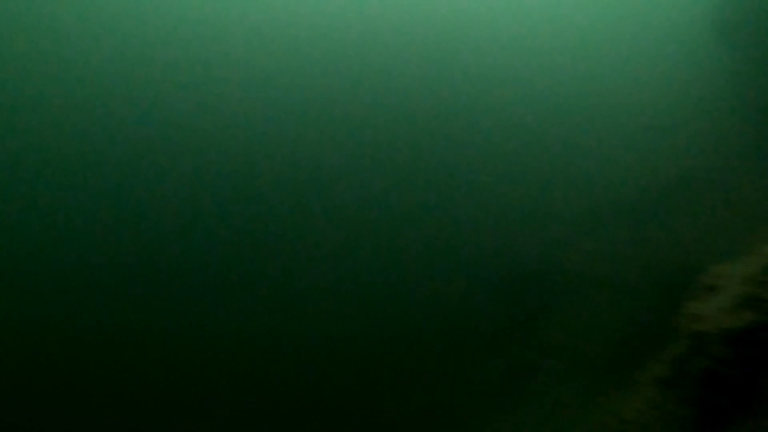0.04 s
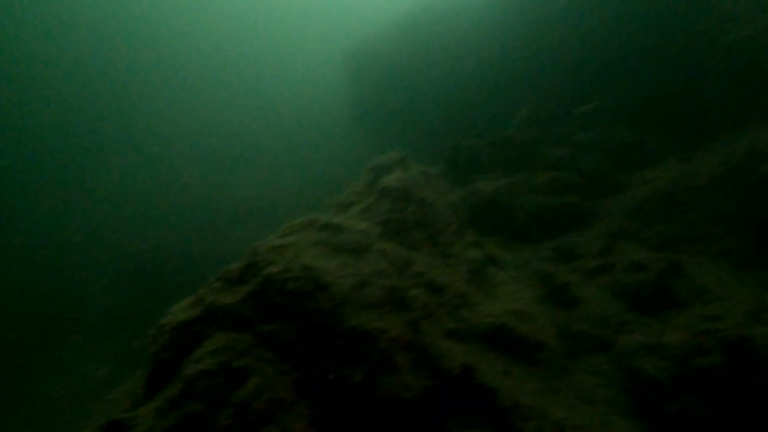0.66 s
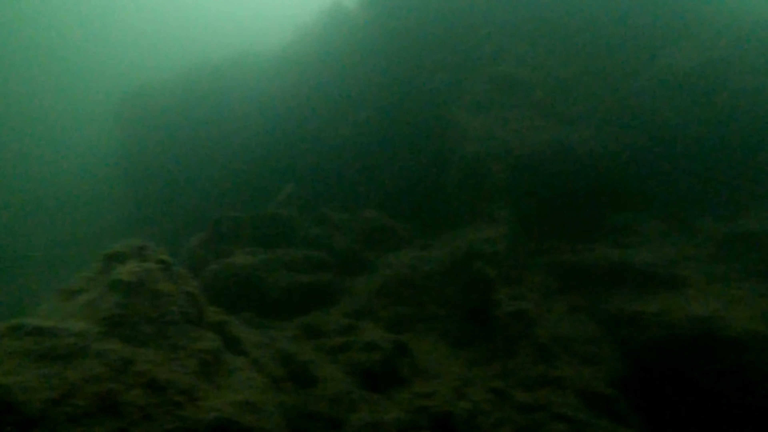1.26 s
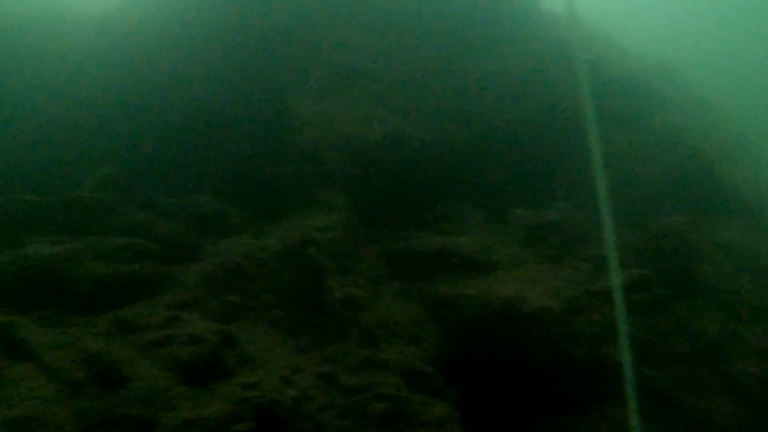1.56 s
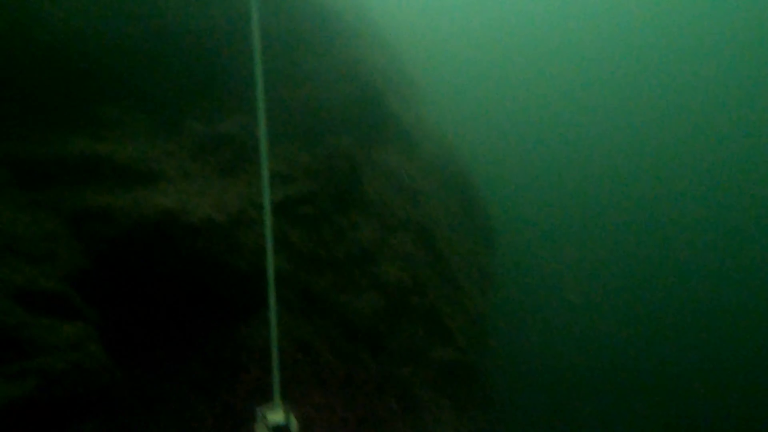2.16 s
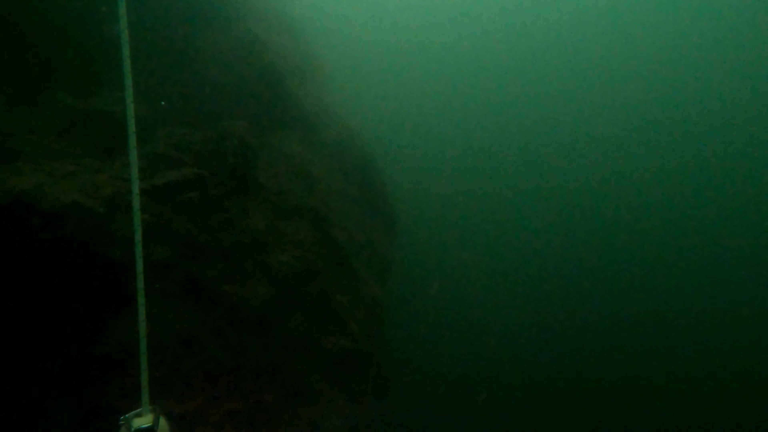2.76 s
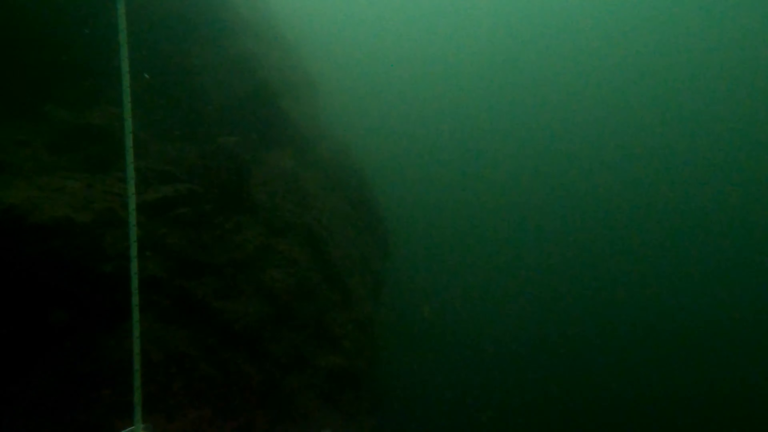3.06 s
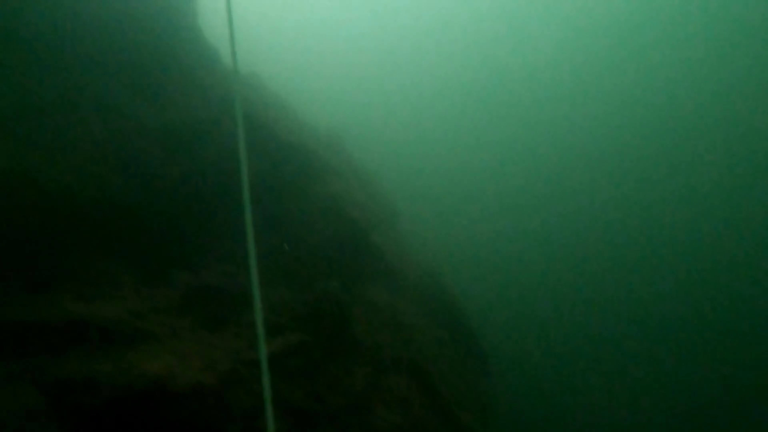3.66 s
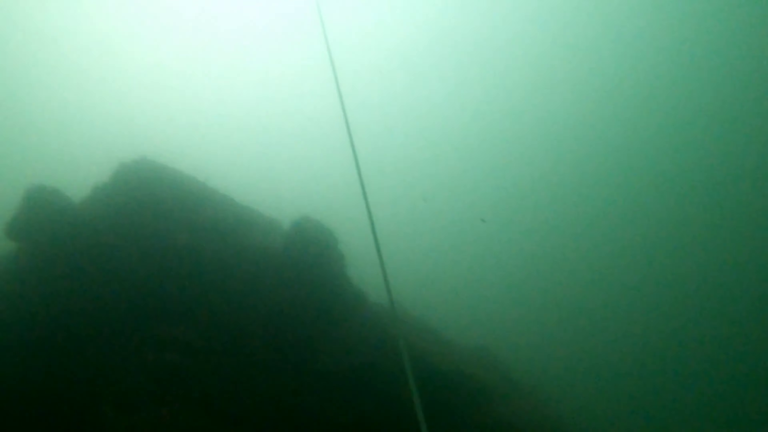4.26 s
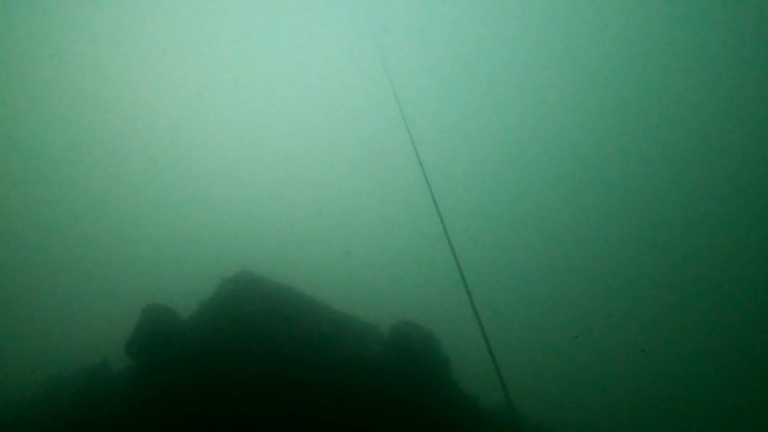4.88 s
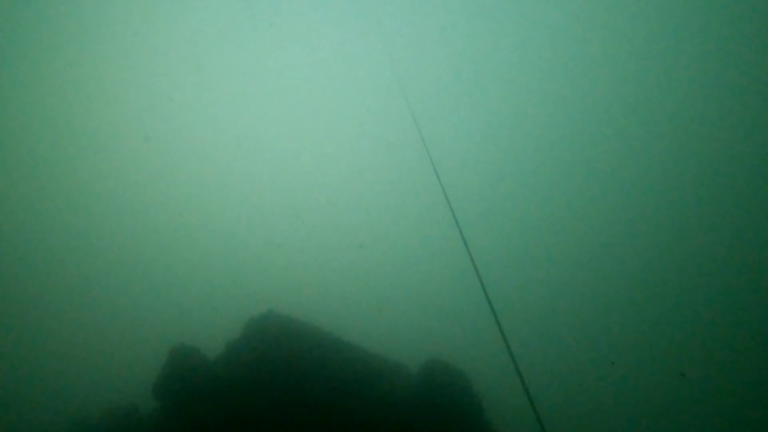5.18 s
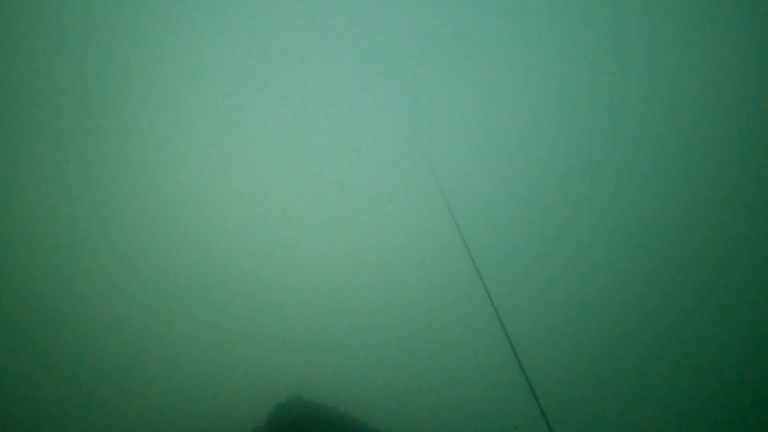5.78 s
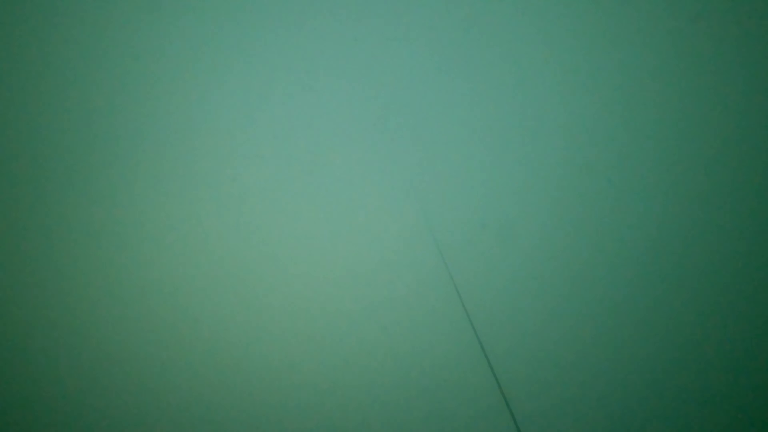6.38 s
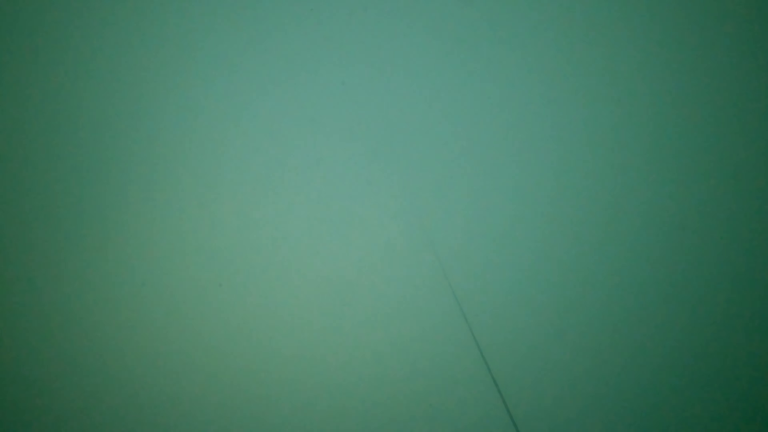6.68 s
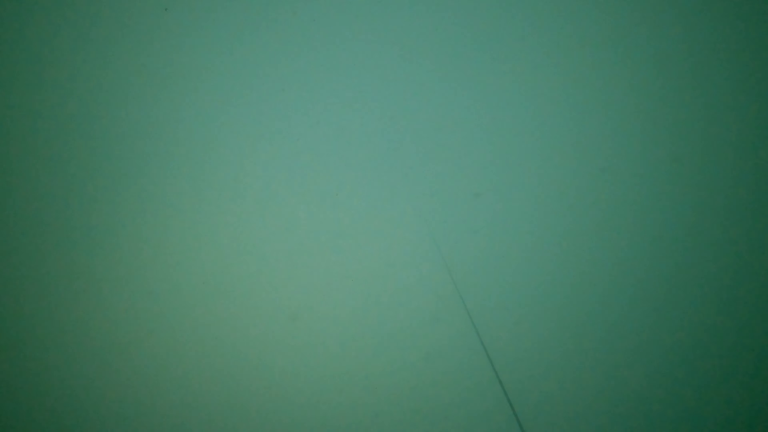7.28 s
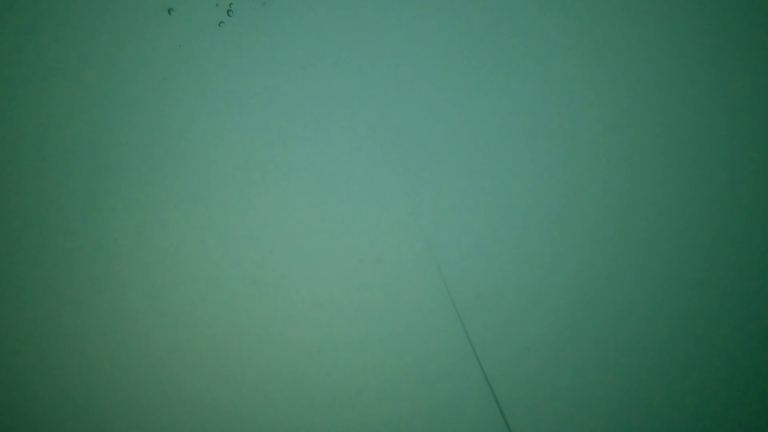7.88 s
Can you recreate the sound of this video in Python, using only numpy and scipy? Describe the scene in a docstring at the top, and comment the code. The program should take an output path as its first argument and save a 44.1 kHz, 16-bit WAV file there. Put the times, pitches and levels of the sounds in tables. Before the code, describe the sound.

Heard from inside a waterproof camera housing moving through a lake, a muffled water rumble runs throughout. Hollow knocks and a run of low, gritty creaks sound right against the shell during the first three seconds. Then come surges of water, short scrapes, thumps and a sharp click, before things settle into quieter flow with faint plopping bubbles.

```python
"""A camera in a waterproof housing moves through a lake, water rumbling past throughout. Knocks ring the
shell at once, and something slides on it with a hiss. From 0.4 to 2.9 s the rubbing sticks and slips in
four low creaks, each slip pushing and ringing the shell, the loudest catching hard. Slides and thumping
knocks follow, the sharpest click at 4.2 s. By 6 s the rubbing fades; small bubbles plop in softer water."""
import sys
import numpy as np
from scipy import signal
from scipy.fft import rfft, irfft
from scipy.io import wavfile
from scipy.ndimage import uniform_filter1d

SR = 44100
rng = np.random.default_rng(int(sys.argv[2]) if len(sys.argv) > 2 else 0)


def wav_out(sig):
    """Save sig, one row per channel (or a flat mono array), as 16-bit PCM at SR to the path in sys.argv[1]."""
    wavfile.write(sys.argv[1], SR, np.round(np.clip(np.atleast_2d(sig).T, -1, 1) * 32767).astype(np.int16))


N = 350236
T = np.arange(N) / SR
HZ = np.fft.rfftfreq(N, 1 / SR)


def amp(db):
    """Decibels to gain."""
    return 10 ** (np.asarray(db) / 20)


def unit_rms(x):
    """Scales to rms 1."""
    return x / np.sqrt(np.mean(x ** 2) + 1e-20)


def curve_at(points, hz):
    """A frequency curve's value at hz."""
    f, value = np.transpose(points)
    return np.interp(np.log(hz + 1), np.log(f + 1), value)


def glide(rows, column):
    """One column of an automation curve at every sample."""
    rows = np.array(rows)
    return np.interp(T, rows[:, 0], rows[:, column])


def held(start, end, rise_s, release_s):
    """An envelope that swells up to start, holds until end and dies away."""
    fade = np.maximum(start - T, 0) / rise_s + np.maximum(T - end, 0) / release_s
    return np.exp(-np.minimum(fade, 30))


def band(x, hz, kind, order=2):
    """A low-pass or high-pass filter."""
    return signal.sosfilt(signal.butter(order, min(hz, SR / 2 - 1), kind, fs=SR, output="sos"), x)


def wander(hz):
    """A random modulator of rms 1, up to about hz."""
    return unit_rms(band(rng.standard_normal(N), hz, "low", order=3))


def levelled(x, size=1900):
    """Rides the gain to iron out slow changes of level."""
    power = uniform_filter1d(uniform_filter1d((x ** 2).mean(0), size), size)
    return x / np.sqrt(abs(power) + 1e-3 * power.mean())


def mottled(x, patch_db):
    """Breaks a noise into short patches of pitch that come and go."""
    spectra = signal.stft(x, nperseg=512)[2]
    patches = uniform_filter1d(rng.standard_normal(spectra.shape[1:]), 6, axis=0)
    patches = unit_rms(uniform_filter1d(patches, 3, axis=1))
    return unit_rms(signal.istft(spectra * amp(patch_db * patches), nperseg=512)[1][:, :N])


def add(mix, s, sound):
    """Mixes a sound in at time s."""
    part = mix[..., max(round(s * SR), 0):][..., :sound.shape[-1]]
    part += sound[..., :part.shape[-1]]


PORT_LEAD = [(100, 0.11), (400, -1.03), (900, -1.4), (1300, -1.07), (1800, -0.92), (2800, -1.16),
             (6000, -0.33)]  # phase between the two microphone ports: f/Hz, left lead/rad
PORT_TILT = [(100, 1.8), (500, 0.8), (1100, 2.3), (1800, 2.6), (3000, 3.5), (6000, 1.2)]  # their balance: f/Hz, left minus right/dB
def port_gains(hz):
    """The stereo image: complex gains of the left and right port."""
    side = amp(curve_at(PORT_TILT, hz) / 2) * np.exp(.5j * curve_at(PORT_LEAD, hz))
    return np.array([side, 1 / side])


def ports(x):
    """A mono sound as the two ports hear it."""
    return irfft(rfft(x) * port_gains(np.fft.rfftfreq(len(x), 1 / SR)), len(x))


PORT_LIKENESS = [(60, 0.98), (130, 0.65), (270, 0.98), (580, 0.5), (1220, 1.22), (2600, 0.8)]  # how alike the ports sound: f/Hz, coherence (capped at 1)
def noise(spectrum):
    """Coloured stereo noise, partly shared by the two ports."""
    left, other = rfft(rng.standard_normal((2, N)))
    same = np.clip(curve_at(PORT_LIKENESS, HZ), 0, 1)
    side = amp(curve_at(PORT_TILT, HZ) / 2)
    right = (same * left + np.sqrt(1 - same ** 2) * other) * np.exp(-1j * curve_at(PORT_LEAD, HZ))
    return unit_rms(irfft(np.array([left * side, right / side]) * amp(curve_at(spectrum, HZ)), N))


# Tone of the three water layers: f/Hz, relative level/dB
RUMBLE_EQ = [(10, -14), (22, 4), (40, 0), (62, -1), (95, -17), (160, -21), (400, -45.5), (2000, -110)]
GURGLE_EQ = [(70, -36.5), (130, 3.5), (250, 0), (380, -9.5), (650, -8), (950, -4), (2000, -52),
             (8000, -96.5)]
HISS_EQ = [(250, -19), (420, -15), (680, 2), (900, -27.5), (1200, -7.5), (1600, 1), (2200, -11.5),
           (3000, -11), (4000, -16), (4700, -14), (5800, -21), (7600, -25.5), (8800, -38.5), (13000, -61)]
FLOW = [(0, -43.5, -45.5), (.8, -44.5, -53.5), (3.25, -42.5, -58), (3.7, -40.5, -56), (4.15, -41, -47.5),
        (4.6, -52, -57), (5.5, -44, -59.5), (6.4, -57, -60.5), (7.1, -53, -62.5), (7.94, -53, -65.5)]  # the bed of passing water: t/s, rumble/dB, gurgle/dB
SURGES = [(.01, -37), (2.971, -35.5), (3.389, -36.5), (3.768, -32), (4.18, -43), (4.399, -36.5),
          (5.02, -36), (5.652, -33.5), (5.8, -39), (6.92, -44.5), (7.438, -37.5)]  # swells on top of it: t/s, rumble/dB
def water(swell_db=3.5, lumpy_db=4.0, surge_s=0.044, surge_gurgle_db=-21, hiss_db=-58):
    """Eddies buffet the housing and gurgle, harder in each surge, over a faint steady hiss."""
    surge = sum(amp(db) * np.exp(-((T - s) / surge_s) ** 2) for s, db in SURGES)
    rumble = levelled(noise(RUMBLE_EQ), size=5000)
    rumble *= np.hypot(amp(glide(FLOW, 1) + swell_db * wander(0.73)), surge)
    gurgle = mottled(noise(GURGLE_EQ) * amp(lumpy_db * wander(12)), patch_db=4.5)
    gurgle *= np.hypot(amp(glide(FLOW, 2)), amp(surge_gurgle_db) * surge)
    return rumble + gurgle + amp(hiss_db) * noise(HISS_EQ)


SHELL_MODES = [(234, 430, -0.5), (343.5, 52, 4), (464, 37, -9.5), (610, 120, -5), (731, 61, -3),
               (1170, 200, -8), (1510, 230, -9), (2424, 110, -16.5), (2890, 150, -14.5), (3185, 260, -18),
               (3910, 190, -28.5), (4610, 310, -25.5), (5400, 230, -30.5), (5950, 510, -33),
               (7380, 230, -36), (8000, 300, -40)]  # the housing's steady resonances: f/Hz, width/Hz, relative level/dB
def shell_ring(bending_modes, size=2048, valley_db=-24):
    """The housing's minimum-phase ring after one tap, at each port."""
    hz = np.fft.rfftfreq(size, 1 / SR)
    power = sum(amp(db) ** 2 / (1 + ((hz - f) / (.5 * width + 1)) ** 2 / 2) ** 2
                for f, width, db in SHELL_MODES + bending_modes)
    log_gain = np.log(power + amp(valley_db) ** 2 / (1 + (hz / 900) ** 6)) / 2
    phase = -signal.hilbert(np.r_[log_gain, log_gain[-2:0:-1]]).imag[:len(hz)]
    ring = np.roll(irfft(np.exp(log_gain + 1j * phase) * port_gains(hz)), 16, axis=1)
    return ring / np.linalg.norm(ring)


BENDING_MODES = [(72, 9.5), (140, -6)]  # two resonances that bend, lower then upper: width/Hz, base level/dB
BENDS = [(.39, 928, 1668, 17.5), (.5, 956, 1610, 4.5), (1.05, 921, 1730, 4.5), (1.25, 978, 1715, 4),
         (1.6, 958, 1745, 4.5), (1.82, 984, 1670, 3), (1.95, 953, 1854, 9.5), (2.09, 977, 1810, 8.5),
         (2.19, 974, 2152, 7.5), (2.43, 1019, 1950, -8), (2.67, 944, 2130, -2.5), (2.83, 1020, 2150, 2),
         (3.46, 952, 1756, 3), (4.12, 933, 1750, 13.5), (4.213, 967, 1590, 13)]  # how pressure moves them: t/s, lower f/Hz, upper f/Hz, upper boost/dB
def pressed_ring(s, damping, detune=(1, 1)):
    """The shell's ring as it is pressed at time s; damping broadens and weakens the lower resonance."""
    times, *columns = np.transpose(BENDS)
    low_hz, high_hz, boost_db = (np.interp(s, times, column) for column in columns)
    (low_width, low_db), (high_width, high_db) = BENDING_MODES
    return shell_ring([(low_hz * detune[0], low_width * damping, low_db - 10 * np.log10(damping)),
                       (high_hz * detune[1], high_width, high_db + boost_db)])


# Knocks on the housing and the loudest catches within the creaks:
# t/s, ring peak/dB, sway/dB, crack gain/dB, contact/s
KNOCKS_AND_CATCHES = [(0.061, -32, -24.5, -61, 0.055), (.11, -34.5, -26, -28, 0.0031),
                      (.303, -27.5, -19, -51, 0.018), (0.356, -21, -15.5, -57, 0.011),
                      (0.388, -8.5, -35, -48, 0.0015), (0.39, -10.5, -15, -53, 0.005),
                      (0.556, -21, -11.5, -48, 0.0079), (0.517, -24.5, -43, -62, 0.0034),
                      (1.023, -26.5, -29, -65, 0.0044), (1.181, -19, -28, -52, 0.014),
                      (1.385, -20, -39, -57, 0.0081), (1.474, -20, -16, -42, 0.0046),
                      (1.603, -20, -42, -31, 0.0056), (1.663, -18, -30, -48.5, 0.0084),
                      (1.812, -13, -39, -49, 0.0091), (1.92, -16.5, -48, -37, 0.0028),
                      (2.509, -18, -13.5, -64, 0.025), (2.567, -19, -24, -52, 0.014),
                      (2.88, -31.5, -16, -38, 0.015), (2.943, -50, -34, -41, .003),
                      (2.991, -46, -31.5, -36, 0.0046), (3.457, -19.5, -15.5, -56, 0.012),
                      (3.467, -30, -36, -19, 0.0025), (3.562, -28, -19.5, -59, 0.02),
                      (3.843, -36, -39, -46, .0057), (3.882, -20.5, -21.5, -38, 0.012),
                      (4.12, -8.5, -33, -46, 0.0025), (4.2126, -4, -24, -5, 0.00092),
                      (4.761, -36.5, -39, -65, 0.0081), (5.246, -36.5, -58, -54, 0.0047),
                      (5.43, -35.5, -47, -48, .003)]
def knocks_and_catches(sway_hz=42, snap_hz=70, sway_s=0.0093, crack_hz=5000, crack_s=0.00063):
    """Each jolt cracks, rings the shell and sets the housing swaying; water cushions the slower ones."""
    out, t = np.zeros((2, N)), np.arange(SR // 6) / SR
    age = t / sway_s
    sway_pitch = sway_hz + snap_hz * np.exp(-2 * age)
    sway = -np.sin(2 * np.pi * np.cumsum(sway_pitch) / SR) * age * np.exp(1 - age)
    for s, ring_db, sway_db, crack_db, contact_s in KNOCKS_AND_CATCHES:
        sharpness = 0.0048 / contact_s  # short jolts are thinner and crack brighter
        jolt = (t == 0) + .15 * rng.standard_normal(len(t)) * np.exp(-t / contact_s)
        thin = band(jolt, 420 * sharpness ** 0.41, "high", order=3)
        jolt = band(thin + amp(-12) * jolt, 3300, "low")  # a little thud stays in
        ring = signal.fftconvolve(jolt[None], pressed_ring(s, damping=1.06), axes=1)[:, :len(t)]
        ring *= 1 - np.exp(-t / (0.074 * contact_s))  # cushioned attack
        ring *= np.exp(-t / (contact_s + 0.0026))  # the ring dies away over the contact time plus a few milliseconds
        crack = 0.49 * np.sin(2 * np.pi * crack_hz * t) + rng.standard_normal(len(t))
        crack = band(crack * np.exp(-t / crack_s), 2500, "high", order=3)
        crack = band(crack, 5400 * sharpness ** 0.14, "low", order=4)
        crack = (ports(crack) + crack) / 2
        add(out, s, amp(ring_db) * ring / abs(ring).max() + amp(crack_db) * crack + amp(sway_db) * sway)
    return out


# Tone of the two sliding layers: f/Hz, relative level/dB
RUB_EQ = [(200, -13), (290, -9.5), (338, 4), (420, -9.5), (740, -5), (950, 1.5), (1170, 6.5), (1420, -9.5),
          (1620, -12.5), (1745, 2.5), (2080, -10.5), (2400, -2), (3000, -14.5), (3600, -26.5),
          (4800, -19.5), (6800, -55), (10000, -82)]
FIZZ_EQ = [(400, -9), (1500, -3), (2200, -12.5), (3000, -11), (4000, -18), (5200, -18), (6300, -23),
           (7000, -30), (8000, -31.5), (9500, -45), (12000, -56)]
SLIDES = [(0.212, 0.042, 0.091, 0.073, -49, -41.5), (0.698, 0.013, 0.04, 0.02, -60, -49.5),
          (1.513, 0.044, 0.04, 0.049, -47, -42), (1.811, 0.016, 0.016, 0.015, -30, -58),
          (1.926, 0.17, 0.042, 0.022, -34.5, -64), (2.358, 0.086, 0.026, 0.057, -41.5, -46.5),
          (2.981, 0.078, 0.0091, .05, -53.5, -62), (3.352, 0.019, .02, .02, -54, -68),
          (3.745, .012, .006, 0.0089, -50, -64), (4.1, 0.012, 0.085, .05, -33, -42),
          (4.206, 0.0018, 0.0056, 0.0025, -28.5, -28.5), (4.265, 0.13, 0.058, 0.11, -51.5, -52.5),
          (4.651, .012, .005, .012, -47.5, -68), (4.994, 0.018, 0.045, 0.081, -39, -63),
          (5.342, 0.16, 0.056, 0.083, -43, -54), (5.576, .02, 0.022, 0.18, -41.5, -66)]  # strokes: full strength at t/s, hold/s, rise/s, release/s, body/dB, fizz/dB
def slides(grain_db=2.0, catch_db=1.1):
    """Smooth sliding on the housing: each stroke is a grainy hiss whose grip wavers a little."""
    grip = unit_rms(amp(grain_db * wander(380) + catch_db * wander(26)))
    body = mottled(noise(RUB_EQ), patch_db=3.5)
    fizz = noise(FIZZ_EQ)
    out = np.zeros((2, N))
    for s, hold, rise, release, body_db, fizz_db in SLIDES:
        out += held(s, s + hold, rise, release) * (amp(body_db) * body + amp(fizz_db) * fizz)
    return grip * out


# Short tones: plops, and the low thump under knocks and a creak's start: t/s, gain/dB, f/Hz
PLOPS_AND_THUMPS = [(0.393, -14, 295), (0.892, -21.5, 185), (.892, -35, 405), (2.578, -19.5, 456),
                    (3.369, -31.5, 150), (3.465, -25, 190), (3.852, -21.5, 149), (3.896, -28.5, 246),
                    (4.216, -22, 124), (4.266, -39.5, 7400), (4.656, -40, 2290), (4.66, -42, 640),
                    (4.709, -37, 150), (6.157, -36, 2770), (6.15, -40.5, 596), (6.21, -40.5, 574),
                    (6.33, -39, 1740), (6.388, -41, 1680), (6.449, -35, 1530), (6.519, -45.5, 423),
                    (6.709, -37, 1580), (6.723, -38.5, 870), (6.773, -41, 1566), (6.85, -37.5, 1500),
                    (6.918, -38, 1470), (7.009, -41, 1370), (7.518, -41.5, 890)]
def plops_and_thumps(decay_s=0.007, rise=0.022, tremble=.075, faint_db=-56, faint_count=60):
    """Brief tones whose pitch rises a little and trembles, smearing into a bubble's plop or a thump."""
    out, t = np.zeros(N), np.arange(SR // 8) / SR
    faint_bubbles = [(when * N / SR, faint_db + 6 * level, 550 * 4 ** pitch)
                     for when, level, pitch in rng.random((faint_count, 3))]
    for s, db, hz in PLOPS_AND_THUMPS + faint_bubbles:
        age = t / decay_s * (hz / 500) ** 0.19  # higher tones die sooner
        shake = unit_rms(uniform_filter1d(rng.standard_normal(len(t)), 70)) / np.hypot(1, hz / 2000)
        phase = 2 * np.pi * np.cumsum(hz * (1 + rise * np.tanh(age) + tremble * shake)) / SR
        add(out, s, amp(db) * np.sin(phase) * np.exp(-age) * (1 - np.exp(-3.5 * age)))
    return ports(out)


def slip(s, rate, scrape=0.24, scrape_cycles=0.21, drag=0.44, bend_scatter=0.018, uneven_db=1.0):
    """One slip: a dull tap, then a gritty scrape that drags on to the next slip; both ring the shell."""
    t = np.arange(int(1.3 * SR / rate)) / SR
    age = t * rate / scrape_cycles
    damping = max(rate / 60, 1) ** 0.31  # quicker rubbing damps the shell more
    ring = pressed_ring(s, damping, detune=1 + bend_scatter * rng.standard_normal(2))
    pressure = np.sqrt(age) * np.exp(-age ** 2) + drag * rate / 100 * np.hanning(len(t)) / 2
    grit = band(scrape * pressure * rng.standard_normal(len(t)), 450, "high")
    tap = band(1. * (t == 0), 850, "low") * amp(4)
    sound = signal.fftconvolve((tap + grit)[None], ring, axes=1)
    cycles = np.arange(sound.shape[1]) / SR * rate
    attack = 1 - np.exp(-(cycles / .065) ** 2)  # the water rounds off the onset
    return amp(uneven_db * rng.standard_normal()) * attack * sound


# Automation of each creak: t/s, slip rate/Hz, ring/dB, rasp/dB
SLOW_CREAK = [(0.4205, 56, -35.5, -67), (0.46, 46, -34.5, -59), (0.48, 57.8, -35.5, -61),
              (0.53, 49.7, -38.5, -62), (0.552, 61, -34, -64), (0.578, 39.4, -37.5, -61.5),
              (0.635, 39.0, -55.5, -66), (0.665, 53, -44, -62), (0.73, 21, -56, -70.5)]
RISING_CREAK = [(0.9485, 33.1, -43, -63), (0.99, 43.1, -36.5, -57), (1.035, 37.33, -35.5, -59),
                (1.08, 50.67, -32.5, -56.5), (1.172, 54.07, -35, -48.5), (1.197, 107.2, -19, -44.5),
                (1.27, 115, -27.5, -49), (1.32, 91.8, -32, -57), (1.36, 64.1, -35.5, -57),
                (1.39, 42.5, -38.5, -61), (1.45, 46.3, -38.5, -50)]
LONG_CREAK = [(1.497, 69.65, -51, -68), (1.53, 55.25, -33, -58), (1.58, 53.22, -28.5, -42.5),
              (1.61, 87.3, -28.5, -51), (1.635, 54, -36, -50), (1.67, 63.65, -28.5, -52),
              (1.7, 79.44, -32.5, -43.5), (1.735, 78.92, -33.5, -51.5), (1.765, 49.43, -37, -44.5),
              (1.815, 94.93, -25, -45.5), (1.85, 85.5, -31, -43), (1.9, 70.3, -35.5, -45),
              (1.935, 91.8, -23, -34), (1.99, 119.4, -29, -39.5), (2.04, 105.3, -25.5, -35),
              (2.085, 147.9, -19.5, -34), (2.145, 88.6, -30.5, -43), (2.22, 101.9, -30.5, -43),
              (2.26, 78, -35.5, -46.5), (2.34, 48.46, -40, -50.5), (2.42, 37.4, -50, -55),
              (2.48, 51.3, -49, -67)]
LAST_CREAK = [(2.572, 62.2, -27, -43.5), (2.588, 143.2, -23.5, -43.5), (2.608, 72, -34, -56.0),
              (2.635, 129.9, -29.5, -48), (2.685, 128.2, -24.5, -46), (2.745, 93, -36, -54),
              (2.81, 79.6, -35, -46.5), (2.865, 48.6, -52.5, -63)]
# The four creaks: automation, base push/dB, slip rate of widest sway/Hz, sheen relative to rasp/dB
CREAKS = [(SLOW_CREAK, -20.5, 46, -5), (RISING_CREAK, -17.5, 54.8, -15), (LONG_CREAK, -18, 54, -17.5),
          (LAST_CREAK, -18.5, 78.4, -15.5)]
def creak(course, push_db, sway_hz, sheen_db, jitter_cycles=.03, wobble_db=2.0, octave_drop_db=11):
    """Stick and slip: the shell bows once a cycle, and each release taps it and scrapes briefly."""
    rate, ring_db, rasp_db = (glide(course, column) for column in (1, 2, 3))
    start, end = course[0][0], course[-1][0]
    cycles = np.cumsum(rate) / SR
    cycles += jitter_cycles * wander(50) - np.interp(start, T, cycles)
    slips = np.zeros((2, N))
    for s in np.interp(np.arange(np.interp(end, T, cycles)), cycles, T):
        add(slips, s, slip(s, np.interp(s, T, rate)))
    ring = levelled(band(slips, 2140, "low", order=8))
    treble = band(slips, 2270, "high", order=8)
    sheen = levelled(band(band(treble, 3570, "high", order=10), 8100, "low", order=8))
    rasp = levelled(band(treble, 3440, "low", order=10)) + amp(sheen_db) * sheen
    # the bowing has a peaked crest, and turns toward a sawtooth as the slips quicken
    angle = 2 * np.pi * (cycles + 0.039)
    overtones = sum(np.sin(k * angle) / (k - 1) for k in range(2, 5))
    bow = 0.066 * np.cos(2 * angle) - np.cos(angle) + 0.044 * rate / 100 * overtones
    follow_db = 0.27 * (ring_db + 34)  # the low end partly rides the ring's level
    sway_db = push_db + follow_db - octave_drop_db * np.log2(rate / sway_hz) ** 2
    push = unit_rms(bow * amp(wobble_db * wander(52))) * amp(sway_db)
    return held(start, end, 0.0036, 0.014) * (push + amp(ring_db) * ring + amp(rasp_db) * rasp)


def scene():
    """The full mix at the two ports."""
    mix = water() + knocks_and_catches() + slides() + plops_and_thumps()
    return mix + sum(creak(*row) for row in CREAKS)


def record(dry, low_cut_hz=24, high_cut_hz=15000):
    """The camera drops the deepest bass and the top of the treble."""
    taps = signal.firwin(255, high_cut_hz, window=("kaiser", 8), fs=SR)
    return signal.oaconvolve(band(dry, low_cut_hz, "high", order=1), taps[None], "same")


dry = scene()
out = record(dry)
wav_out(out)
```